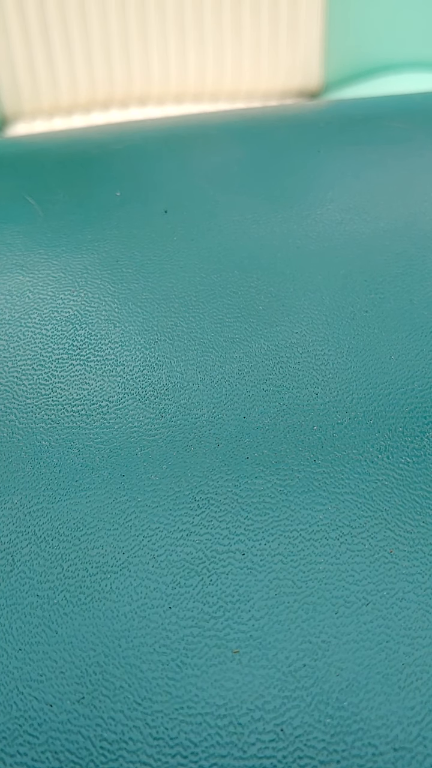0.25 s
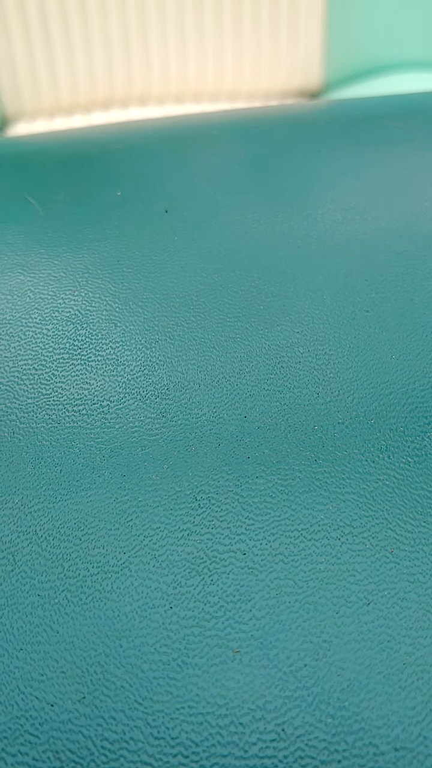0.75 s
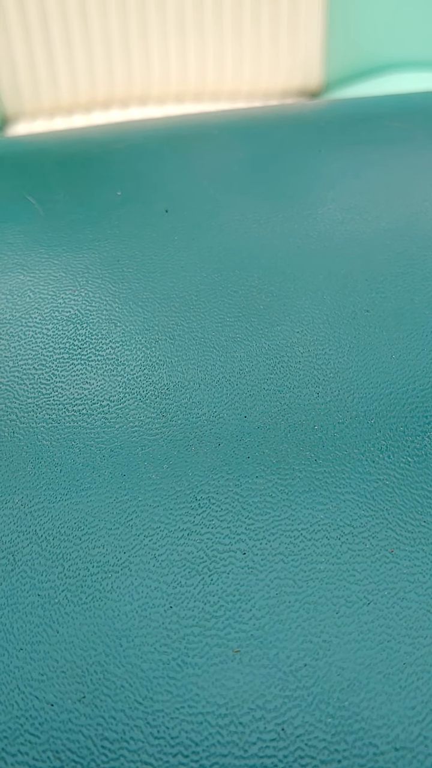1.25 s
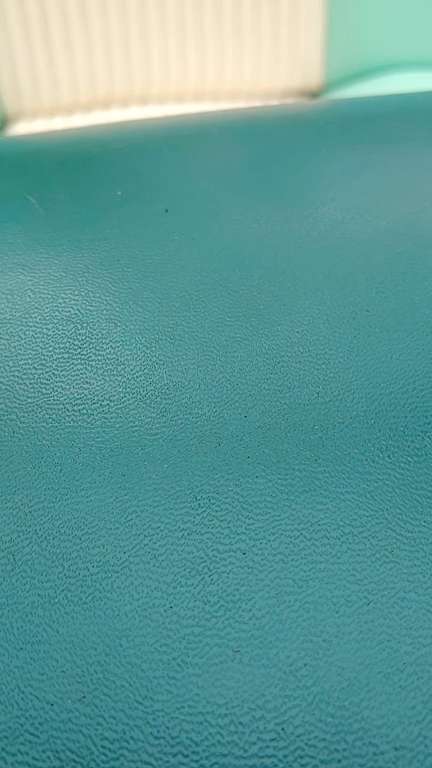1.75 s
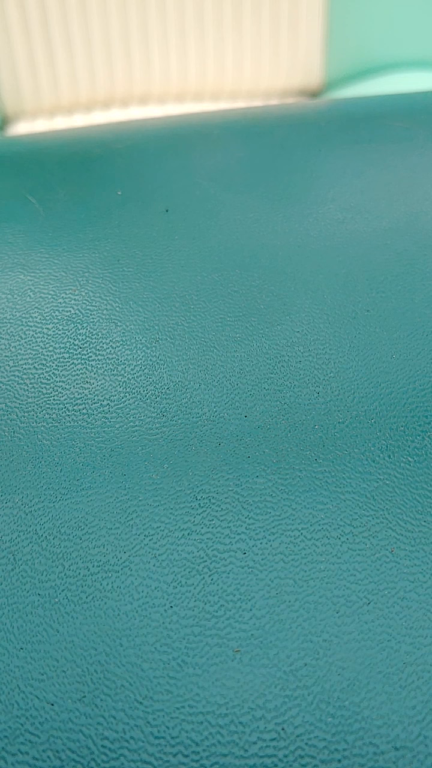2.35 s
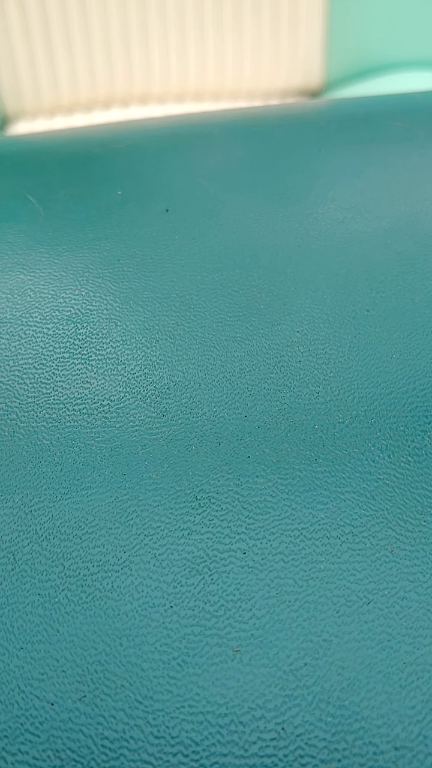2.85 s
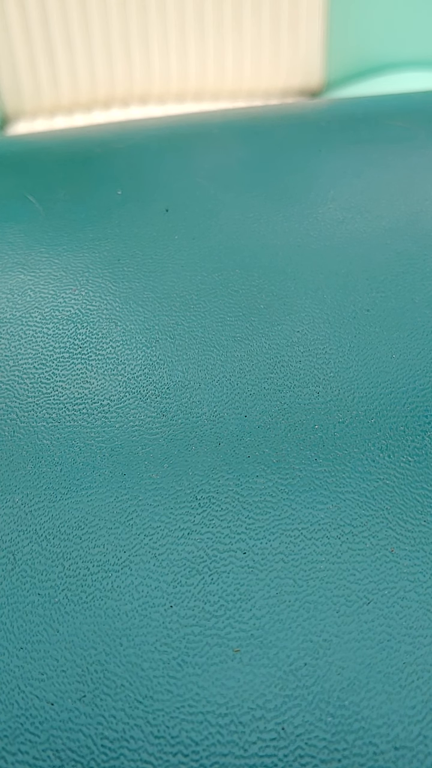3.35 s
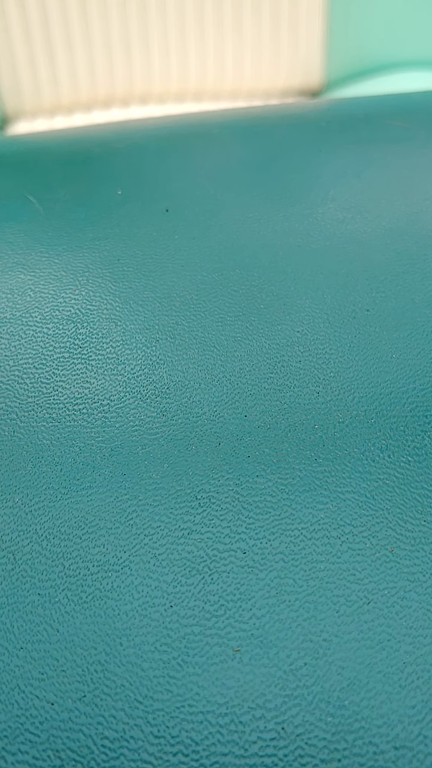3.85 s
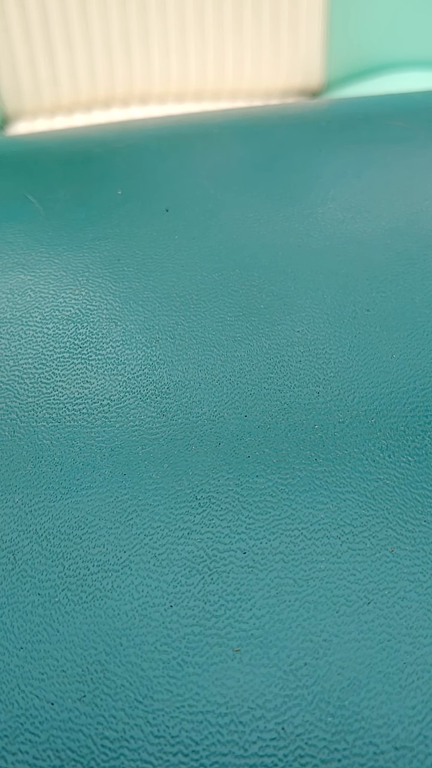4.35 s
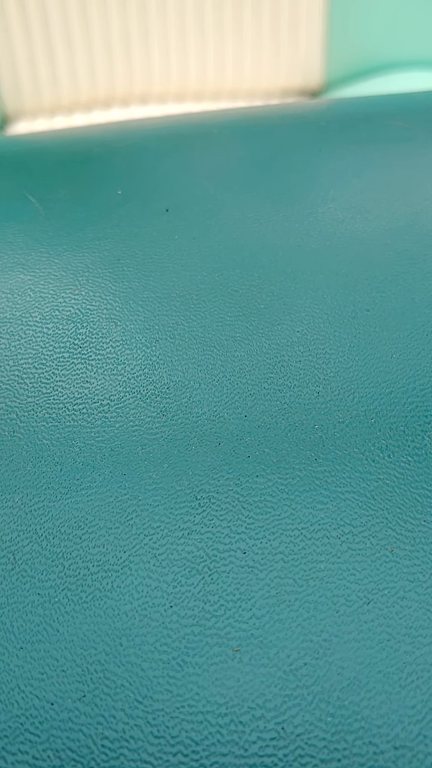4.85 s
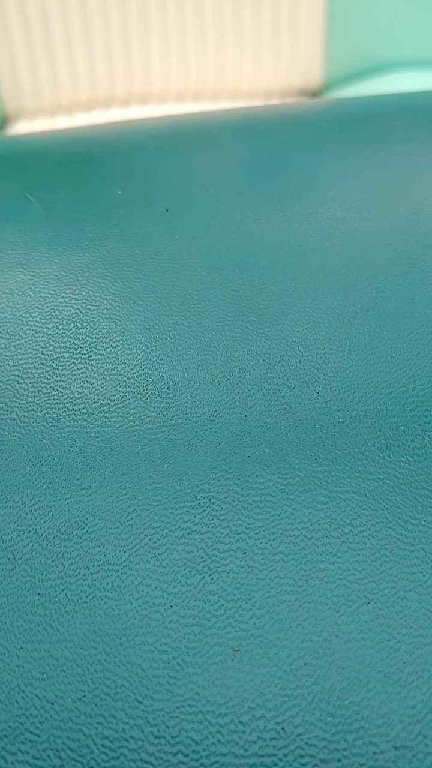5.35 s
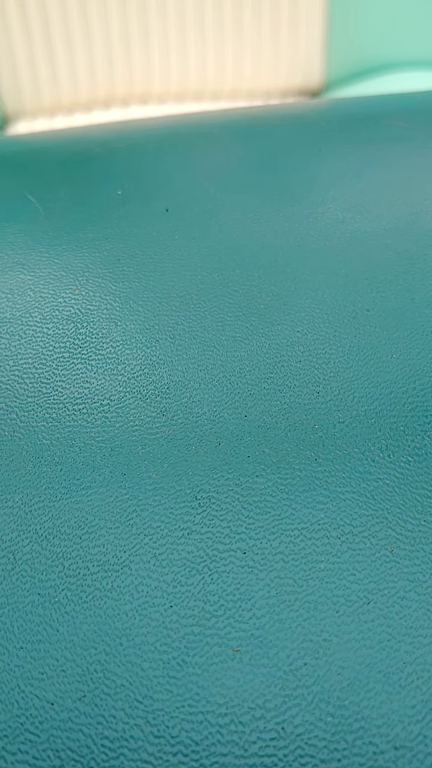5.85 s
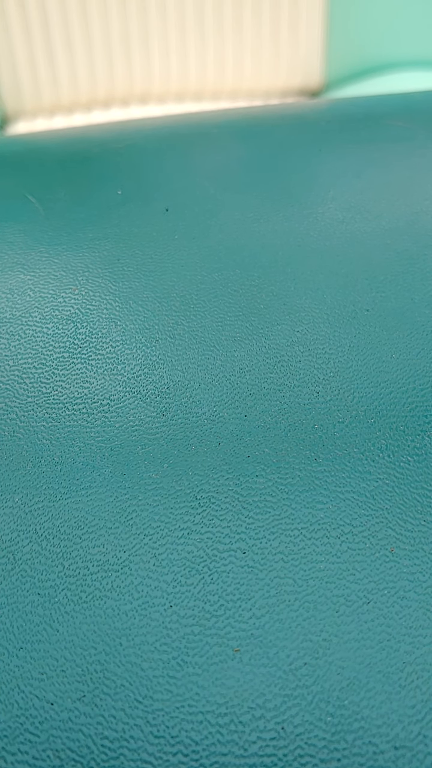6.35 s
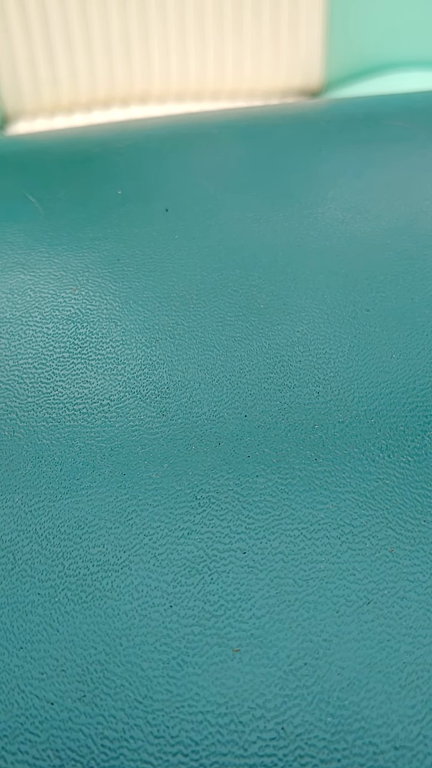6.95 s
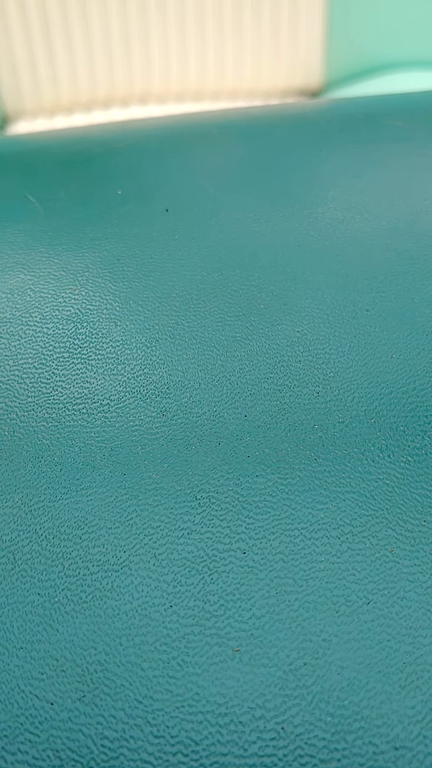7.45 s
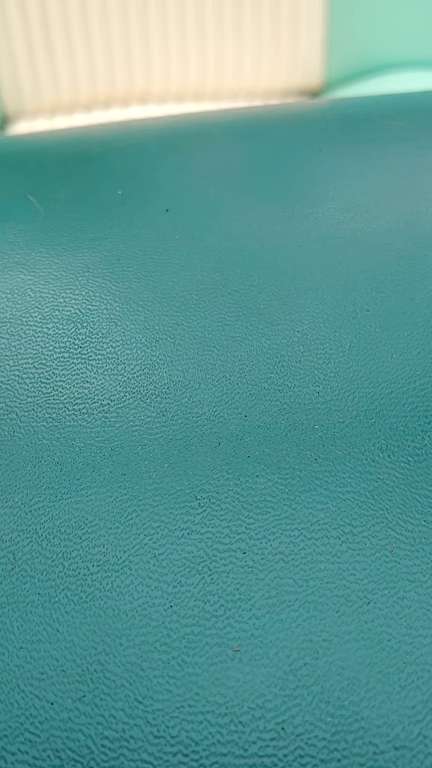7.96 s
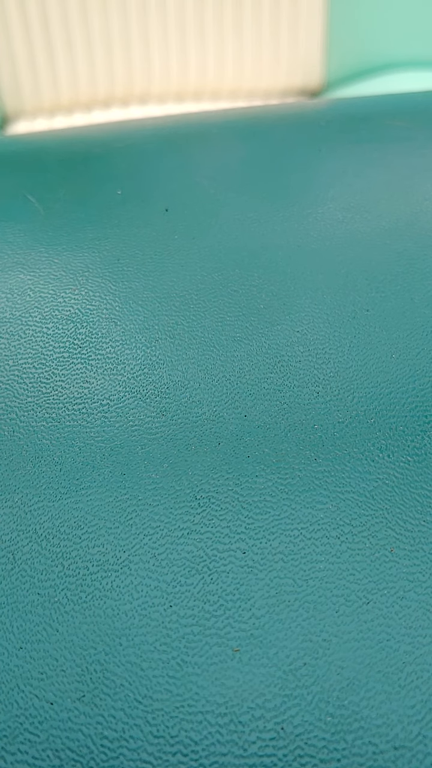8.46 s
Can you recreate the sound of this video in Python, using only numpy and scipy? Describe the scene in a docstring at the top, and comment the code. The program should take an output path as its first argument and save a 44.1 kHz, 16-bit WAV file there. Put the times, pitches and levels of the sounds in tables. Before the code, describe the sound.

Steady rough idling of a worn eight-cylinder car engine, close up in the engine bay. The deep pulse lopes about seven times a second, with irregular weak beats and a swelling panel boom. Over it run dense metallic ticks, knocks and rattle, fan and block rumble, thin belt singing and a broad breathy intake hiss. The engine never revs or stops; the sound is close and dry.

```python
"""An uneven exhaust throb first: an old V8 idling at about 800 rpm, heard close by under an open hood.
Throb and hum are sines locked to the two-turn crank cycle; block and fan are shaped noise.
Pistons, valves and loose tappets are short rings with rattle, struck at set places in every cycle.
A belt-driven pulley sings thinly; the carburettor is hissing noise with narrow whistling bands."""
import sys
import numpy as np
from scipy import signal
from scipy.fft import rfft, irfft, next_fast_len
from scipy.io import wavfile
from scipy.ndimage import uniform_filter1d, minimum_filter1d, map_coordinates

SR = 44100
rng = np.random.default_rng(int(sys.argv[2]) if len(sys.argv) > 2 else 0)


def to_wav(sig):
    """Store sig (one row per channel, or 1-D mono) as 16-bit WAV at the path in sys.argv[1].

    Samples outside -1..1 are clipped; the rate is SR.
    """
    pcm = np.clip(np.atleast_2d(sig), -1, 1) * 32767
    pcm = np.round(pcm).astype(np.int16)
    wavfile.write(sys.argv[1], SR, pcm.T)  # frames by channels


N = 383669
T = np.arange(N) / SR
SIZE = next_fast_len(N + 8192, real=True)
FREQ = np.arange(SIZE // 2 + 1) * SR / SIZE
CYLINDERS = 8
PORT_LAG_S = 0.00058  # left microphone port hears the clatter later


def undb(db):
    """Decibels to gain."""
    return 10 ** (np.asarray(db) / 20)


def unit(x):
    """Scale to rms 1."""
    return x / np.sqrt(np.mean(x ** 2))


def pan(left_minus_right_db):
    """Left and right gains for a level difference."""
    return undb(np.array([[left_minus_right_db], [-left_minus_right_db]]) / 2)


def delay(x, lag_s):
    """Shift in time, wrapping round."""
    return np.roll(x, int(round(lag_s * SR)))


def filtered(x, response):
    """Apply a frequency response given on FREQ."""
    return irfft(rfft(x, SIZE) * response, SIZE)[..., :N]


def resonance(hz, width_hz):
    """Response of one mode, gain 1 at its centre."""
    return 1j * FREQ * width_hz / (hz ** 2 - FREQ ** 2 + 1j * FREQ * width_hz)


def colour(table, skirt_db):
    """Left and right responses from a spectrum; beyond its ends they fall by skirt_db an octave."""
    hz, *sides = np.transpose(table)
    octave, knots = np.log2(FREQ + 1), np.log2(hz)
    outside = np.abs(octave - np.clip(octave, knots[0], knots[-1]))
    level_db = np.array([np.interp(octave, knots, db) for db in sides]) - skirt_db * outside
    return undb(level_db) * np.sqrt(SR / 2)  # white noise of rms 1 to dB per Hz


def walk(rate_hz):
    """Smooth random drift with spread 1."""
    points = rng.standard_normal(4096)
    coarse_s = T[::32]
    drift = map_coordinates(points, [coarse_s * rate_hz + 2], order=3, mode="wrap")
    return unit(np.interp(T, coarse_s, drift))


def churn(cycle, repeat, slip=0.00025):
    """Dense noise; the power share `repeat` comes back with every cycle, slightly early or late."""
    pattern = irfft(np.r_[0, np.exp(2j * np.pi * rng.random(3000))], 65536)
    index = ((cycle + slip * walk(30)) * len(pattern)).astype(int) % len(pattern)
    locked = unit(pattern[index])
    return np.sqrt(repeat) * locked + np.sqrt(1 - repeat) * rng.standard_normal(N)


def ports(lag_s, likeness, cycle=T, repeat=0):
    """Noise at two microphone ports: a shared part, late at the left one, and unrelated reflections."""
    shared, own = churn(cycle, repeat), churn(cycle, repeat)
    left = likeness * delay(shared, lag_s) + np.sqrt(1 - likeness ** 2) * own
    return np.array([left, shared])


# idle speed, hunting up and down: time_s, firing_rate_hz
IDLE_SPEED = [(0.0, 54.14), (0.16, 53.05), (0.51, 54.21), (1.05, 53.15), (1.54, 54.44), (1.73, 53.76),
              (2.14, 54.95), (2.6, 53.14), (2.92, 54.93), (3.28, 53.65), (3.73, 54.56), (3.87, 54.17),
              (4.04, 54.8), (4.5, 53.99), (4.77, 54.97), (4.99, 54.31), (5.36, 54.65), (5.78, 53.93),
              (6.15, 55.34), (6.5, 53.63), (6.77, 54.73), (7.24, 53.71), (7.56, 54.54), (8.22, 53.79),
              (8.6, 54.14), (8.7, 55.57)]


def crankshaft():
    """Cycles turned so far: two crank turns and eight firings each, integrated from the idle speed."""
    return np.cumsum(np.interp(T, *np.transpose(IDLE_SPEED))) / SR / CYLINDERS


# exhaust orders: cycle_multiple (8 = firing rate), level_db, left_minus_right_db
EXHAUST_ORDERS = [(4, -48, 1), (8, -20, 2), (9, -32, 3), (10, -47, 6), (11, -30, 2), (18, -34.5, -8)]


def exhaust(cycle, strong_place=0.838, lope_db=2.5, drift=0.00076, waver_db=1.04):
    """One cylinder fires harder, so the orders beside the firing rate align once a cycle."""
    crank = cycle + drift * walk(9) - strong_place
    out = 0
    for order, db, pan_db in EXHAUST_ORDERS:
        order = round(order)
        uneven_db = 0 if order == CYLINDERS else lope_db * walk(7)
        out = out - undb(db + uneven_db) * np.cos(2 * np.pi * order * crank) * pan(pan_db)
    return np.sqrt(2) * out * undb(waver_db * walk(6))


# cycles in which one cylinder stumbles: time_s
STUMBLE_TIMES = [.15, .3, .89, 1.04, 1.64, 1.79, 2.23, 2.37, 2.52, 2.67, 2.97, 3.11, 3.85, 4.15, 4.44, 4.88,
                 5.03, 5.47, 5.62, 5.76, 6.35, 6.5, 7.09, 7.23, 8.42]


def stumble(cycle, place=0.012, order=9.05, rise=0.046, decay=0.19, db=-14.5, weak=0.37, scatter_db=2.1):
    """An erratic cylinder rings the exhaust hard when it fires, weakly and inverted when it stumbles."""
    turn = np.round(cycle - place).astype(int)
    age = cycle - place - turn  # rise, decay and age are shares of the cycle
    stumbled = np.isin(turn, np.round(np.interp(STUMBLE_TIMES, T, cycle)))
    strength = undb(db + scatter_db * rng.standard_normal(turn[-1] + 1))[turn]
    strength = strength * np.where(stumbled, weak, -1)
    envelope = np.exp(np.minimum(age / rise, -age / decay))
    envelope = envelope * np.minimum(1, 10 * (0.5 - np.abs(age)))  # closes at the seams
    return strength * envelope * np.cos(2 * np.pi * order * age) * pan(0.3)


# hum of pipes and panels: cycle_multiple (rounded in use), level_db, left_minus_right_db
HUM_ORDERS = [(13, -38, 5), (15, -37.5, -11), (16, -40.5, 5), (24, -30.5, 0), (25, -40, 3), (26, -40, 1),
              (28, -39.5, -9), (31, -42, -3), (32, -33, 8.5), (40, -30, 11.5), (42, -31.5, 5),
              (47, -48, 13), (51, -44, 12), (52, -47, -5), (54, -42.5, -5), (56, -37.5, -1), (60, -39, -13),
              (90.1, -51, -4), (113.3, -35.5, -2), (121.4, -47.5, -19), (122.7, -48, -21)]


def hum(cycle, waver_db=0.5, slip=0.00093):
    """Higher crank orders shake pipes and panels, smeared by a random drift of the crank."""
    crank = cycle + slip * walk(9)
    out = 0
    for order, db, pan_db in HUM_ORDERS:
        tone = np.sqrt(2) * np.cos(2 * np.pi * (round(order) * crank + rng.random()))
        out = out + undb(db + waver_db * walk(12)) * tone * pan(pan_db)
    return out


# block and fan spectrum, before block_db: freq_hz, left_db_per_hz, right_db_per_hz
BLOCK_SPECTRUM = [(25, -66, -66), (66, -42, -42), (100, -45, -42.5), (187, -49.5, -46), (240, -42.5, -52.5),
                  (294, -40, -42.5), (320, -49, -48.5), (470, -51, -50.5), (692, -48.5, -45),
                  (1140, -54, -55.5), (1150, -61.5, -57), (1700, -52.5, -46.5), (1950, -59, -49.5),
                  (2720, -66, -87)]


def block(cycle, block_db=-2, pulse_db=0.06, flutter_db=0.28, likeness=0.71, bass_hz=300, lag_s=0.00042):
    """Block and fan churn, a little louder at every firing; the bass reaches both ports together."""
    bass = 1 / (1 + (FREQ / bass_hz) ** 4)
    low = filtered(ports(0, 0.89, cycle, repeat=0.15), np.sqrt(bass))
    high = filtered(ports(lag_s, likeness, cycle, repeat=0.36), np.sqrt(1 - bass))
    firing = np.cos(2 * np.pi * CYLINDERS * cycle)
    pulsing = (low + high) * undb(pulse_db * firing + flutter_db * walk(40))
    return filtered(pulsing, colour(BLOCK_SPECTRUM, skirt_db=48)) * undb(block_db)


# panel boom, coming and going: time_s, change_db
BOOM_CHANGE = [(0.0, -3), (0.32, -0.5), (0.38, -11), (0.5, 5.5), (0.74, -7), (0.92, 3.5), (1.04, -8),
               (1.16, -1.5), (1.64, 2), (1.76, -7), (2.0, 3), (2.48, -3.5), (2.54, 3.5), (2.66, -8),
               (2.84, 2.5), (3.26, -4.5), (3.38, 3), (3.44, 1), (4.22, -0.5), (4.4, 1.6), (4.64, 2.5),
               (4.88, 0), (5.06, 0), (5.72, -0.5), (6.02, 2), (6.26, -4.5), (6.38, 6), (6.5, -11.5),
               (6.74, 2), (7.28, -2), (7.46, 2.5), (8.18, -1.8), (8.3, -5.5), (8.7, -2)]


def boom(x, hz=280, width_hz=60):
    """A panel's boom swells and sinks: one resonant band with a changing gain."""
    gain = undb(np.interp(T, *np.transpose(BOOM_CHANGE)))
    return x + (gain - 1) * filtered(x, resonance(hz, width_hz))


def knock(cycle, place, hz, decay_s, db, rattle, glide_hz_per_s=0, scatter_db=0.4, jitter_s=0.00022,
          rattle_hz=420, swell=0.5526, detune=0.0087):
    """One part struck at the same place in every cycle: its ring swells and dies with a rattle burst."""
    turns = np.arange(-1, int(cycle[-1]) + 1)
    t = np.arange(SR // 16) / SR
    out = np.zeros(N + len(t))
    peak = signal.iirpeak(hz, np.sqrt(1500 * hz) / rattle_hz, fs=SR)
    grit = signal.lfilter(*peak, rng.standard_normal(2 * SR))
    grit = unit(signal.lfilter(*peak, grit))
    age = t / (swell * decay_s)
    shape = age ** 2 * np.exp(-age)  # builds up through the casting before it fades
    glide = glide_hz_per_s * (t / 2 - decay_s)  # passes hz at t = decay_s
    times_s = np.interp(turns + place, cycle, T, left=-1, right=-1) - swell * decay_s
    for time_s, (late, size, bend) in zip(times_s, rng.standard_normal((len(times_s), 3))):
        start = int((time_s + jitter_s * late) * SR)
        if 0 <= start < N:
            ring = np.sqrt(2) * np.sin(2 * np.pi * (hz * (1 + detune * bend) + glide) * t)
            burst = np.take(grit, start + np.arange(len(t)), mode="wrap")
            out[start:start + len(t)] += undb(db + scatter_db * size) * shape * (ring + rattle * burst)
    return out[:N]


def knocks(cycle, table, rattle):
    """Parts struck once a cycle, each with its own gliding ring."""
    return sum(knock(cycle, place, hz, decay_s, db, rattle, glide)
               for place, hz, glide, decay_s, db in table)


# piston knocks: place_cycle (0-1), ring_hz, glide_hz_per_s, decay_s (before swell), level_db (before shape)
PISTON_KNOCKS = [(.005, 760, 0, 0.00435, -14), (.075, 798, 3000, 0.00567, -16),
                 (.185, 819, -5000, 0.00474, -15), (0.226, 1087, -30000, 0.00315, -26),
                 (.3, 645, 15000, 0.0031, -22), (.48, 1035, 0, 0.0031, -36), (.62, 520, 30000, 0.0038, -24),
                 (.67, 783, 12000, 0.00595, -18), (.785, 790, 10000, 0.00365, -22.5),
                 (.84, 1162, -20000, .004, -27.5), (.905, 594, 25000, 0.0026, -27)]


def pistons(cycle):
    """Pistons knock at the same places in every cycle."""
    return knocks(cycle, PISTON_KNOCKS, rattle=0.32)


def valves(cycle, hz=1790, decay_s=0.00254, db=-25.5, spread=0.00896, detune=0.072, spread_db=2.8):
    """Two valves per cylinder tick in turn, each with its own slight offset, pitch and strength."""
    count = 2 * CYLINDERS
    quirks = rng.standard_normal((count, 3))
    quirks = (quirks - quirks.mean(axis=0)) / quirks.std(axis=0)
    out = 0
    for k, (late, bend, size) in enumerate(quirks):
        place = (k + 0.5) / count + spread * late  # share of the cycle
        out = out + knock(cycle, place, hz * (1 + detune * bend), decay_s, db + spread_db * size, rattle=0.4)
    return out


# loose tappets: place_cycle (0-1), ring_hz, glide_hz_per_s, decay_s (before swell), level_db (before shape)
TAPPET_CHIRPS = [(.031, 2330, -22000, .005, -21.5), (.036, 1360, 0, 0.0019, -23),
                 (.044, 1790, 15000, 0.00313, -19), (.1, 1664, 0, 0.00495, -25),
                 (.175, 2330, 0, 0.00378, -44), (.294, 2910, 40000, 0.00282, -24),
                 (.295, 2153, -30000, 0.00411, -26.5), (.33, 1680, -20000, 0.00395, -26),
                 (.335, 3036, -10000, 0.00374, -26), (.345, 2027, 18000, 0.00419, -17),
                 (.4, 1825, 10000, 0.00295, -22), (.486, 3614, -30000, 0.00258, -25.5),
                 (.5, 1990, -8000, 0.00386, -15.5), (.547, 1695, -15000, 0.00361, -24),
                 (.549, 2110, 20000, 0.00308, -34), (.549, 3080, -10000, 0.00292, -26.5),
                 (.585, 2220, 40000, 0.00306, -24), (.735, 2185, 10000, 0.0028, -36),
                 (.84, 1700, 0, 0.00294, -22), (.982, 1585, -35000, 0.00358, -22)]


def tappets(cycle):
    """Loose tappets chirp once a cycle, most with a fast pitch glide."""
    return knocks(cycle, TAPPET_CHIRPS, rattle=0.17)


def engine_bay(x, wet_db=-10, decay_s=0.0021, pan_db=-6):
    """The knocks come from the right; hood and wings throw back a short, dense echo."""
    t = np.arange(SR // 10) / SR
    echo = rng.standard_normal((2, len(t))) * np.exp(-t / decay_s)
    echo /= np.sqrt(np.sum(echo ** 2, axis=1, keepdims=True))
    direct = np.array([delay(x, PORT_LAG_S), x])
    reflected = signal.fftconvolve(x[None], echo, axes=1)[:, :N]
    return (direct + undb(wet_db) * reflected) * pan(pan_db)


def rockers(cycle, place=0.26, depth_db=4.5, hz=2250, width_hz=1000, db=-33):
    """The rocker gear rattles: band noise, loudest in the half-cycle where most tappets chirp."""
    shake = undb(depth_db * np.cos(2 * np.pi * (cycle - place)))
    rattle = ports(PORT_LAG_S, 0.13, cycle, repeat=0.23) * shake
    band = resonance(hz, width_hz) ** 2 * np.exp(-(FREQ / hz / 2) ** 2)
    return unit(filtered(rattle, band)) * undb(db) * pan(-1)


def pulley(cycle, order=80.8, db=-37, slip=0.0016, waver_db=2.0):
    """A belt-driven pulley sings between the crank orders, wavering as the belt slips."""
    tone = np.sqrt(2) * np.cos(2 * np.pi * order * (cycle + slip * walk(9)))
    return tone * undb(db + waver_db * walk(12)) * pan(-7)


# carburettor hiss spectrum, before hiss_db: freq_hz, left_db_per_hz, right_db_per_hz
HISS_SPECTRUM = [(2640, -62, -59.5), (3160, -71, -62.5), (3580, -66, -57), (4080, -61, -56),
                 (4460, -62, -53.5), (4900, -67.5, -61.5), (5350, -77, -64), (5900, -68, -72),
                 (6780, -70.5, -82.5), (7730, -89.5, -80.5), (8900, -77, -83), (9120, -96, -95.5),
                 (10840, -82, -89), (12060, -96.5, -101)]


def hiss(lag_s, hiss_db=-1):
    """Air tears past the nearly shut throttle: broad noise, mostly unrelated between the ports."""
    return undb(hiss_db) * filtered(ports(lag_s, 0.29), colour(HISS_SPECTRUM, skirt_db=9))


# air horn modes, before widening and whistle_db: freq_hz, width_hz, left_db, right_db
HORN_MODES = [(3040, 39, -47.5, -42.5), (3144, 60, -57, -45), (3289, 68, -50, -33.5),
              (3510, 68, -54, -53.5), (3502, 86, -55, -31.5), (4150, 60, -35, -37.5), (3923, 89, -40, -32),
              (3760, 90, -45, -53), (4210, 43, -53, -32), (4366, 50, -44, -32.5), (4460, 55, -50, -36),
              (4590, 17, -66, -42), (4700, 59, -60, -34), (4880, 70, -53, -35.5), (5240, 120, -53, -38.5),
              (5410, 60, -45, -39)]


def whistle(lag_s, whistle_db=-1, widening=1.51):
    """The air rings the horn's resonances: noise through narrow bands whose powers add."""
    power = 0
    for hz, width_hz, left_db, right_db in HORN_MODES:
        mode = resonance(hz, widening * width_hz) ** 2 * undb([[left_db], [right_db]])
        power = power + np.abs(mode) ** 2 * SR / (2 * width_hz)
    return undb(whistle_db) * filtered(ports(lag_s, 1.0), np.sqrt(power))


# hiss band changes: middle_s (rows below 0 are inaudible), half_length_s, freq_hz, width_hz, left_db, right_db
BAND_SWELLS = [(-2, 0.077, 5200, 1100, -8, -5), (-3.5, .5, 3950, 350, -3.5, -2),
               (0.8, 0.5, 6600, 1300, -3.5, -1.5), (0.5, 0.041, 4700, 300, 5, 6.5),
               (-1.2, 0.054, 4300, 300, 2, -2), (.25, 0.13, 5550, 600, 1, 4),
               (8, 0.16, 4350, 1100, -1.5, -4)]


def carburettor(flutter_db=0.6, lag_s=0.0003, edge_hz=5050, edge_width_hz=1100, steady_edge_db=1.54):
    """Sucked air hisses and whistles; bands of it swell or sink for a moment."""
    air = hiss(lag_s) + whistle(lag_s)
    air = air + (undb(steady_edge_db) - 1) * filtered(air, resonance(edge_hz, edge_width_hz))
    for middle_s, half_s, hz, width_hz, left_db, right_db in BAND_SWELLS:
        swell_db = np.array([[left_db], [right_db]]) * np.exp(-((T - middle_s) / half_s) ** 2)
        air = air + (undb(swell_db) - 1) * filtered(air, resonance(hz, width_hz))
    return air * undb(flutter_db * walk(40))


def suction(cycle, place=0.42, depth_db=0.13):
    """The cylinders draw unevenly, so the hiss swells once a cycle."""
    return undb(depth_db * np.cos(2 * np.pi * (cycle - place)))


def scene():
    """Sum of all sources on one crank."""
    cycle = crankshaft()
    body = boom(exhaust(cycle) + stumble(cycle) + hum(cycle) + block(cycle))
    clatter = engine_bay(pistons(cycle) + valves(cycle) + tappets(cycle)) + rockers(cycle)
    return body + clatter + pulley(cycle) + carburettor() * suction(cycle)


def record(dry, ceiling=0.88, top_hz=11900):
    """A limiter ducks peaks above the ceiling, both sides alike; a steep low-pass cuts the top."""
    span = SR // 200  # 5 ms
    headroom = np.minimum(1, ceiling / (np.max(np.abs(dry), axis=0) + 1e-9))
    gain = uniform_filter1d(minimum_filter1d(headroom, span), span)
    low_pass = signal.ellip(10, 0.2, 80, top_hz, fs=SR, output="sos")
    return signal.sosfilt(low_pass, dry * gain)


dry = scene()
out = record(dry)
to_wav(out)
```